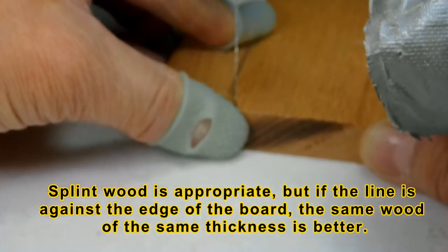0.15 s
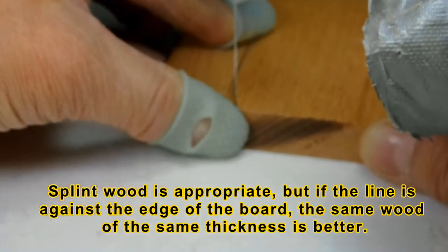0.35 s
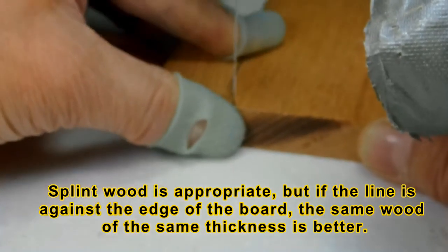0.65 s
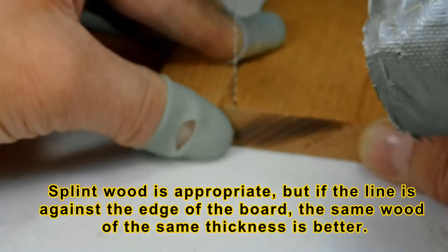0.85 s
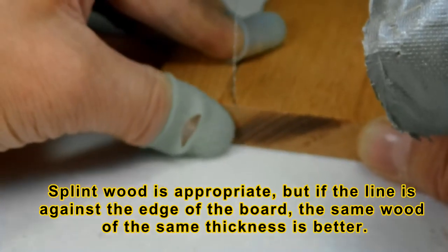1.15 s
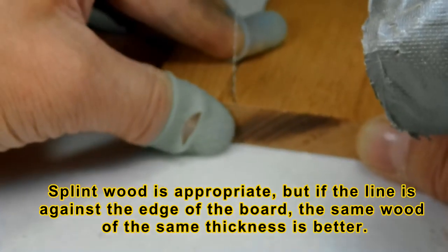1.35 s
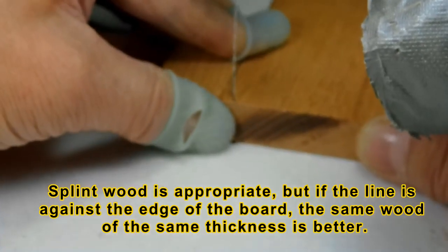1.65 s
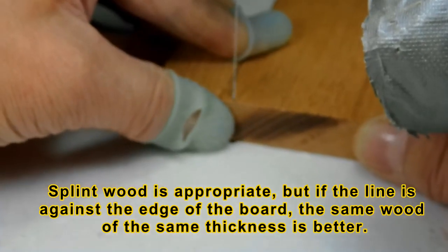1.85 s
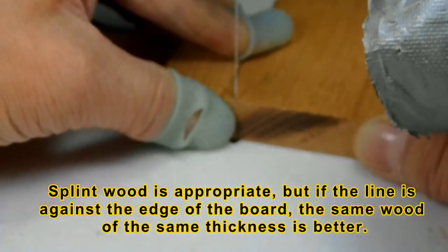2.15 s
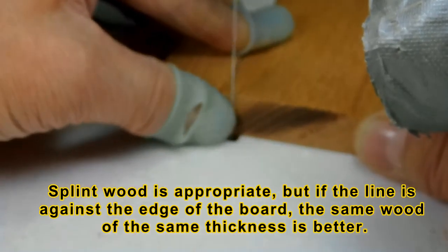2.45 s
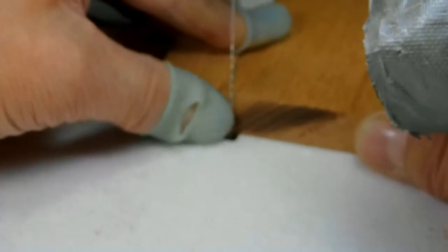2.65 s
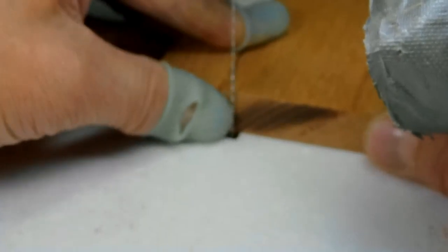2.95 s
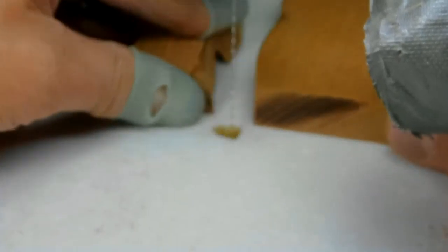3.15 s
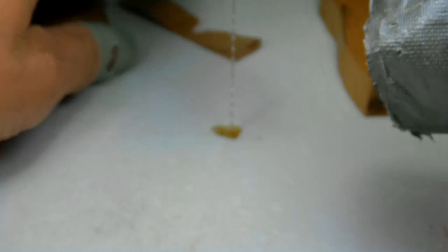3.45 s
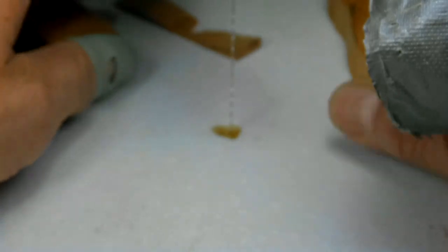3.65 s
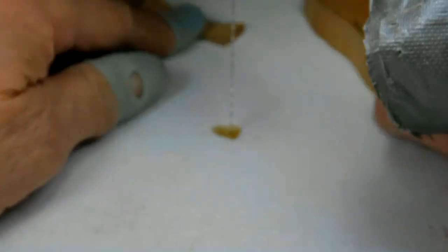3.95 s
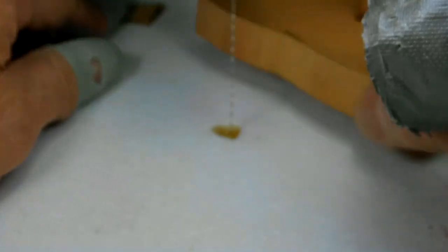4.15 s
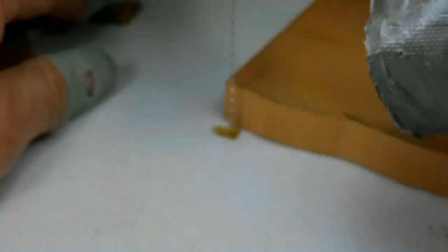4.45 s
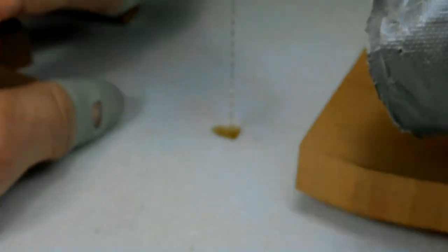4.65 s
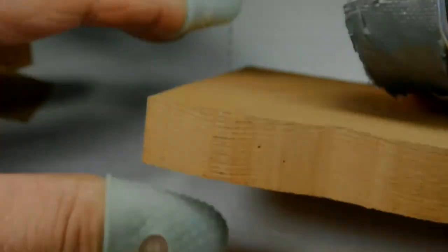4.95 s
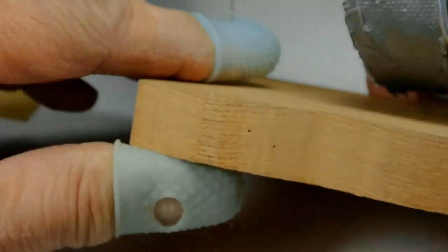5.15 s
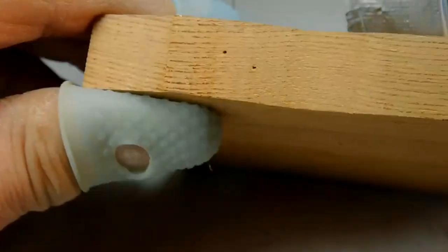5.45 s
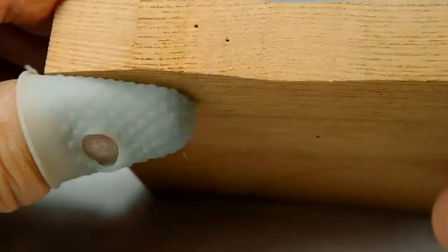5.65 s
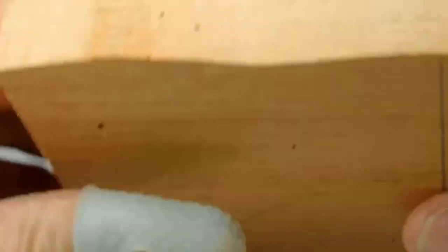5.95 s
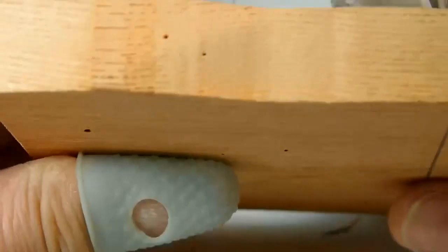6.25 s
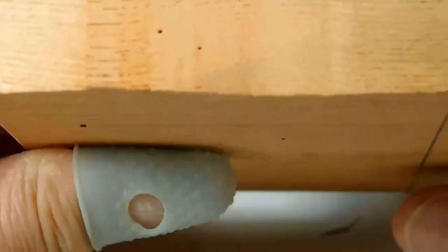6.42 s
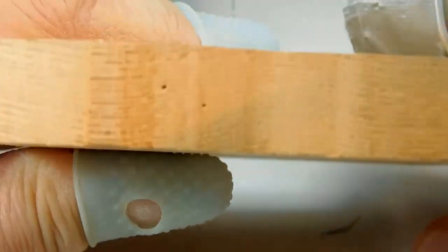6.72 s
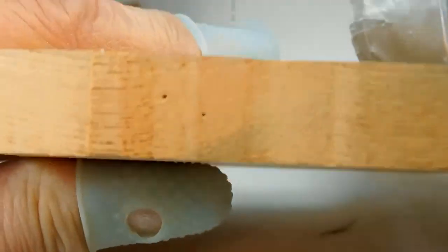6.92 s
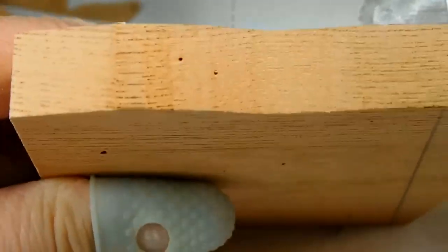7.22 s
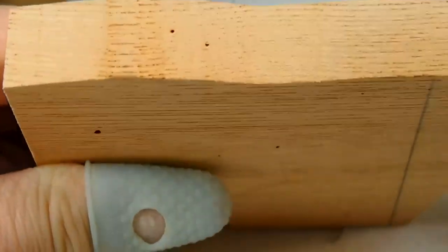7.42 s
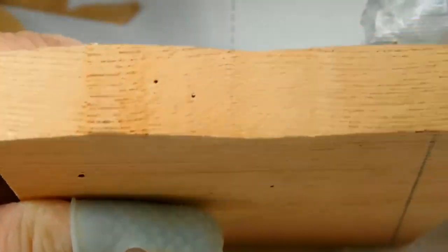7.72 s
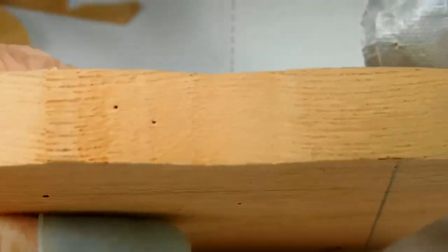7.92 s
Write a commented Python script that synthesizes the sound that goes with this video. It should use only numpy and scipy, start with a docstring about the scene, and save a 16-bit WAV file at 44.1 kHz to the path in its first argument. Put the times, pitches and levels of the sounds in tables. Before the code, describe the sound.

Fast buzzing saw strokes finish a wooden cut beside a humming suction nozzle, then only the brighter, fluttering airflow continues.

```python
"""A scroll saw finishes a cut through a thick block: band-filtered grains of noise rasp, sines locked to the
crank sing as teeth, and a squeak and a puff of chatter sound twice a stroke until the blade leaves the wood.
Beside it a dust extractor draws air through a nozzle: a sine whines, and noise rung through resonances
makes the rush, swelling and fading as hands and block move round the nozzle."""
import sys
import numpy as np
from scipy import signal
from scipy.fft import rfft, irfft
from scipy.io import wavfile
from scipy.ndimage import uniform_filter1d, map_coordinates

SR = 44100
rng = np.random.default_rng(int(sys.argv[2]) if len(sys.argv) > 2 else 0)


def pcm_store(signal):
    """Save signal as 16-bit PCM."""
    levels = np.round(np.clip(np.atleast_2d(signal), -1, 1) * 32767)
    wavfile.write(sys.argv[1], SR, levels.astype(np.int16).T)


N = 356328

# Crank speed, sagging under load and racing as the blade comes free: time_s, turns_per_s
CRANK = [(0.0, 20.11), (0.55, 20.4), (1.05, 20.72), (1.6, 19.74), (2.1, 20.57), (2.5, 19.33), (2.62, 21.63),
         (2.85, 21.02), (3.2, 20.28)]
APART_S, LIFTED_S, MOVE_S = 3.19, 5.0, .08   # halves drawn apart, block held up; time a move takes


def amp(db):
    """Level definition: the amplitude gain of a value in dB."""
    return 10 ** (np.asarray(db) / 20)


def rms_one(x):
    """Power normalisation: scale a signal to rms 1."""
    return x / np.sqrt(np.mean(x ** 2) + 1e-20)


def seconds():
    """Sampling: the time of every sample in seconds."""
    return np.arange(N) / SR


def in_time(rows, after_db=None):
    """Linear interpolation: the columns of a time table, one value a sample."""
    times, *columns = np.transpose(rows)
    return [np.interp(seconds(), times, column, right=after_db) for column in columns]


def at_hz(points, hz):
    """Logarithmic frequency scale: read a spectrum table between its points."""
    table_hz, values = np.array(points).T
    return np.interp(np.log(hz), np.log(table_hz), values)


def drift(rate):
    """Low-passed randomness: a slow wander of rms 1, changing about rate times a second."""
    samples_per_knot = 200
    knots = rng.standard_normal(int(N / samples_per_knot) + 200)
    span = max(1, int(110 / rate))
    slow = uniform_filter1d(uniform_filter1d(knots, span), span)
    return np.interp(np.arange(N) / samples_per_knot, np.arange(len(slow)), rms_one(slow))


def bell(x, centre, length):
    """Gaussian envelope: 1 at the centre, with the length as standard deviation."""
    return np.exp(-.5 * ((x - centre) / length) ** 2)


def resonate(x, hz, width_hz, count=1):
    """Damped resonance: a two-pole filter of peak gain 1, repeated count times for steeper flanks."""
    r = np.exp(-np.pi * width_hz / SR)
    g = (1 - r * r) / 2
    section = [g, 0, -g, 1, -2 * r * np.cos(2 * np.pi * hz / SR), r * r]
    return signal.sosfilt([section] * count, x)


def stereo(mid, side, alike, pan_db):
    """Interchannel coherence: mix two independent noises to a given correlation and left-minus-right level."""
    alike = np.clip(alike, -.99, .99)
    common, opposed = np.sqrt(1 + alike) * mid, np.sqrt(1 - alike) * side
    pair = np.array([common + opposed, common - opposed])
    return pair * np.array([amp(pan_db / 2), amp(-pan_db / 2)]).reshape(2, -1)


def crank_turns():
    """Kinematics: crank angle in turns is the running integral of its speed."""
    start_turns = -0.114
    return start_turns + np.cumsum(in_time(CRANK)[0]) / SR


def hiss():
    """Broadband turbulence: shaped noise fills the valleys between the resonances."""
    # Power spectrum of the air noise: frequency_hz, relative_db
    spectrum = [(12, -77), (20, -38.5), (412, -21.5), (473, -20), (575, -33), (2060, -13.5), (2570, -18),
                (3040, -9.5), (4120, -24), (9220, -21.5), (15200, -28.5)]
    # Left-right correlation: frequency_hz, likeness
    likeness = [(60, 0.8), (180, .7), (540, 0.68), (1630, 0.98), (4900, 0), (14700, .1)]
    # Left-right balance: frequency_hz, left_minus_right_db
    balance = [(60, -4), (150, -4), (380, -8), (940, -2), (2350, -5.5), (5890, -2), (14700, -4)]
    level_db = -46.5
    hz = np.maximum(np.fft.rfftfreq(N, 1 / SR), 1)
    mid, side = rfft(rng.standard_normal((2, N))) * amp(at_hz(spectrum, hz))
    out = irfft(stereo(mid, side, at_hz(likeness, hz), at_hz(balance, hz)), N)
    return amp(level_db) * out / np.std(out.mean(axis=0))


def whistles():
    """Narrow-band noise: faint, nearly steady thin notes of the extractor, one of them near twice the pitch of
    the whine."""
    # Thin notes: frequency_hz, width_hz (of one filter pass; two are made), level_db (rms before panning)
    notes = [(789, 14, -62), (942, 8, -59), (1044, 9, -62), (1071, 9, -63), (1130, 10, -67),
             (1206, 10, -64), (1270, 14, -67), (2711, 12, -60)]
    out = 0
    for hz, width_hz, db in notes:
        out = out + amp(db) * rms_one(resonate(rng.standard_normal(N), hz, width_hz, count=2))
    return out * amp([[-3.5], [2.5]])


def whine():
    """Rotational tone: the extractor's rotor sounds one sine, wavering slightly in phase and level."""
    # Rotor note: time_s, pitch_hz, level_db (rms before waver and panning)
    rotor = [(0, 467.8, -43), (1.1, 468.8, -42), (1.4, 470, -42.5), (2.1, 471.2, -44), (3.9, 471.1, -45.5),
             (8.08, 470.2, -43.5)]
    hz, db = in_time(rotor)
    phase = 2 * np.pi * np.cumsum(hz) / SR + 0.066 * drift(30)
    note = np.sin(phase) * amp(0.38 * drift(20))
    return np.sqrt(2) * amp(db) * note * amp([[-2.6], [2.0]])


def air(modes, gust, flicker_db, patchy_db, slide=None):
    """Flow-excited resonance: noise rings each mode, which flickers and wanders per channel; mean of both rms 1."""
    out = 0
    for hz, width_hz, db, pan_db, alike in modes:
        rings = resonate(rng.standard_normal((2, N + SR // 2)), hz, 1.35 * width_hz, count=2)
        if slide is None:
            mid, side = rings[:, :N]
        else:   # reading faster or slower shifts the resonance
            read_at = [np.cumsum(slide)]
            mid, side = (map_coordinates(ring, read_at, order=3) for ring in rings)
        flicker = flicker_db * (0.43 * gust + drift(21))   # shared gust plus the mode's own flicker
        patches = patchy_db * np.array([drift(1.7), drift(1.04)])
        out = out + amp(db + flicker + patches) * stereo(mid, side, alike, pan_db)
    return out / np.std(out.mean(axis=0))


def casing(gust):
    """Structural resonance: noise rings the low modes of the extractor casing."""
    # Modes: frequency_hz, width_hz (before 1.35x broadening and two passes), relative_db,
    # left_minus_right_db, likeness (left-right correlation)
    modes = [(35, 37, -26, -3, .6), (128, 17, -19.5, -6, 0.58), (188, 40, -17, -3, 0.98),
             (246, 78, -11.5, -4.5, 0.86), (347.3, 34.4, -3.5, -2.5, 1), (399, 37, -7.5, -7.5, 0.69),
             (498, 85, -4, -5.5, 0.53), (687, 175, -5, -5.5, 0.95), (787, 73, 0.5, -4.5, 0.97),
             (926.3, 69, 3.5, -6, 0.89), (1080, 130, -6.5, -1, 0.7), (1190, 36, -6.5, 8, 0.84),
             (1262, 65, -9, -5, .7)]
    # Level of the casing: time_s, level_db
    level = [(0, -44), (1.2, -47.5), (2.6, -45), (3.5, -44), (4.4, -44.5), (5.3, -45.5), (6.2, -44.5),
             (7.2, -44.5), (8.1, -43.5)]
    return amp(in_time(level)[0]) * air(modes, gust, flicker_db=0.93, patchy_db=0.76)


def nozzle_levels():
    """Acoustic shading: each group's level as the block shades the nozzle, leaves, and is held up."""
    # Rush bands near 2, 3 and 3.5 kHz: time_s, at_2k_db, at_3k_db, at_3k5_db
    mid_bands = [(0.0, -42, -52, -49), (0.04, -47, -51, -41.5), (0.16, -44.5, -49.5, -44),
                 (1.22, -43.5, -47.5, -42), (2.14, -41.5, -43, -43.5), (2.63, -39, -39, -43),
                 (3.06, -39.5, -39, -43), (3.08, -38, -35.5, -41), (3.13, -41, -42, -45),
                 (3.22, -36, -38, -42.5), (3.58, -37, -45, -48.5), (3.8, -38, -41, -45),
                 (4.0, -36, -41, -46.5), (4.3, -37, -43.5, -46.5), (4.36, -38.5, -38.5, -47.5),
                 (4.77, -36, -43.5, -46.5), (4.88, -38.5, -40.5, -46.5), (5.22, -38, -36, -42.5),
                 (5.45, -37, -44.5, -45.5), (5.49, -37.5, -43.5, -50), (5.94, -39, -45.5, -46),
                 (6.01, -38.5, -42.5, -45), (6.46, -38.5, -39.5, -43.5), (6.97, -38, -40, -45),
                 (7.18, -39.5, -42.5, -43), (7.6, -39, -45, -44), (8.03, -38, -44, -41),
                 (8.08, -36, -44, -46)]
    # Two treble bands: time_s, at_5k_db, at_9k_db
    treble_bands = [(0.0, -54, -58), (0.02, -51.5, -59), (2.11, -46.5, -56.5), (3.06, -45.5, -49),
                    (3.13, -47, -53), (3.19, -43.5, -44.5), (3.35, -46.5, -53), (3.44, -47.5, -47),
                    (4.16, -48.5, -50), (4.28, -49, -55), (4.34, -46.5, -46), (4.5, -49, -50.5),
                    (4.73, -52, -47), (4.82, -52, -49), (4.93, -48.5, -46.5), (5.11, -50, -55),
                    (5.31, -48.5, -44.5), (5.54, -43.5, -48.5), (5.85, -48, -47.5), (5.99, -48, -53),
                    (6.1, -48.5, -46), (6.37, -47.5, -49.5), (7.63, -50, -51), (8.08, -49, -48)]
    # Five more bands: time_s, at_1k8_db, at_6k3_db, at_7k7_db, at_10k5_db, at_12k_db
    more_bands = [(0.0, -46, -51, -54, -57, -59), (0.11, -47, -55.5, -56, -67, -65),
                  (1.26, -47.5, -49.5, -55, -59, -56), (1.48, -45.5, -53, -55.5, -57, -59),
                  (2.77, -42.5, -46.5, -47, -58, -58), (3.11, -42.5, -45.5, -45.5, -58, -57),
                  (3.26, -42, -52, -49, -49, -50), (3.31, -36, -54, -48, -51, -52),
                  (3.44, -39, -54.5, -51, -46, -50), (3.76, -40, -50.5, -48, -51, -51),
                  (3.89, -36.5, -54, -52, -48, -53), (4.0, -37, -57, -51, -51, -47),
                  (4.14, -37, -53, -46.5, -48.5, -55), (4.28, -41, -51, -50, -51, -50),
                  (4.34, -39, -48, -46, -51, -56), (4.45, -38, -54, -53, -44, -56),
                  (4.5, -33, -48, -53, -52, -54), (4.57, -38, -47, -45, -49, -50),
                  (4.59, -36.5, -50, -47, -52, -54), (4.75, -37, -52, -51, -49, -50),
                  (4.93, -39, -53, -46.5, -53, -52), (4.95, -37, -54, -50, -47, -50),
                  (4.99, -42, -52, -55, -53, -52), (5.31, -40, -48.5, -54, -53, -57),
                  (5.69, -40, -52, -54, -55, -51), (5.83, -42.5, -49.5, -53, -56, -53),
                  (6.21, -43, -53, -51, -53, -55), (6.25, -39, -52, -53, -54, -51),
                  (6.59, -43.5, -53, -50, -55, -53), (6.86, -41, -53, -50.5, -55, -55),
                  (7.65, -43, -53, -52, -53, -51), (7.97, -45, -55, -52, -49, -52),
                  (8.03, -45, -52, -47, -53, -50), (8.08, -39, -56, -53, -50, -52)]
    # The loosened block rides the blade and throbs the rush: time_s, swing_db (scales the two-harmonic swing)
    throb = [(0, .3), (2.3, .4), (2.55, 1.4), (3.0, 1.6), (3.15, .3)]
    edge_s, throb_place = 2.95, .98   # cut reaches the edge; zero phase of the throb in turns
    s = seconds()
    cut = np.clip(s / edge_s, 0, 1) ** 1.7
    apart, lifted = (np.clip((s - at) / MOVE_S + .5, 0, 1) for at in (APART_S, LIFTED_S))
    at_1k4 = -49.5 - 3 * cut + 6 * apart + 2.5 * lifted   # dB
    at_5k, at_9k = in_time(treble_bands)
    at_1k8, at_6k, at_8k, *top = in_time(more_bands)
    angle = 2 * np.pi * (crank_turns() - throb_place)
    throb_db = in_time(throb, after_db=0)[0] * (np.cos(angle) - 0.81 * np.cos(2 * angle))
    levels = [at_1k4, at_1k8, *in_time(mid_bands), at_5k, at_6k, at_8k, at_9k, *top]
    return [db + throb_db for db in levels]


def moving_echo(x):
    """Comb filtering: an echo off the moving hand and block, strongest with the halves apart, sweeps the colour."""
    echo_db, delay_s, wander_s = -11, .0007, .00005   # wander is the rms change of delay
    s = seconds()
    late = s - delay_s - wander_s * drift(1.5)
    moves_s = [APART_S - MOVE_S, APART_S, LIFTED_S, LIFTED_S + MOVE_S]
    strength = np.interp(s, moves_s, [0.1, 0.96, 1.0, 0.28])
    echo = np.array([np.interp(late, s, channel) for channel in x])
    return x + amp(echo_db) * strength * echo


def nozzle_rush(gust):
    """Turbulent inflow: air noise rings groups of hose and nozzle resonances, the treble with a moving echo."""
    # One list per group, low to high: frequency_hz, width_hz (before 1.35x broadening and two passes),
    # relative_db, left_minus_right_db, likeness (left-right correlation)
    groups = [
        [(1303, 18, 17, -12.5, 0.67), (1338, 17, 18.5, -8, .8), (1408, 47, 23, -2.5, 0.29),
         (1519, 17, 18.5, -11, 0.96), (1563, 68, 16.5, -7, .65)],
        [(1700, 69, -3.5, -17, 1), (1793, 132, -1.5, -5.5, 0.82), (1856, 90, 1, -8.5, 0.73)],
        [(1987, 116, 1.5, -9.5, 0.85), (2115, 186, 1, -9, 0.85), (2315, 126, -2, -7, 0.43)],
        [(2754, 170, -5.5, -9, 0.48), (2982, 246, 2, -13, 0.9), (3176, 164, -2.5, -9, .8)],
        [(3423, 100, 13, -15, .9), (3565, 330, 17.5, -9.5, 0.56)],
        [(4590, 510, 2.5, -8, 0.4), (5300, 320, -1, -3.5, 0.93)],
        [(6130, 1060, 0.5, -8, 0.25), (6910, 590, -2.5, -1, 0.18)],
        [(7465, 400, 0, -7, 0.46), (8250, 620, -1, 2.5, 0.3)],
        [(9190, 820, 0, -7, 0.32)],
        [(10590, 520, 0, -6.5, 0.26)],
        [(11980, 750, -2.5, -4, 0.37), (12850, 380, -5, 5, .4), (13500, 900, -10, -8, .2)],
    ]
    # The 3 kHz group slides as the block swings past: time_s, reference_hz (ratio to the first row is used)
    slide_rows = [(0, 2970), (4.05, 2970), (4.15, 2820), (4.5, 3020), (4.7, 2970), (5.0, 2950), (5.3, 3030),
                  (5.45, 2970)]
    slides = [None, None, None, in_time(slide_rows)[0] / slide_rows[0][1], None]
    levels = nozzle_levels()
    rush, treble = 0, 0
    for db, modes, slide in zip(levels, groups, slides):   # the five lower groups
        rush = rush + amp(db) * air(modes, gust, flicker_db=0.5, patchy_db=.5, slide=slide)
    for db, modes in zip(levels[5:], groups[5:]):
        treble = treble + amp(db) * air(modes, gust, flicker_db=0.94, patchy_db=1.7)
    return rush + moving_echo(treble)


def tones(turns, table, waver, swells=()):
    """Periodic excitation: sines at multiples of the crank, each wavering in strength and phase."""
    s, out = seconds(), 0
    for multiple, db in table:
        for swell_multiple, at_s, length_s, gain_db in swells:
            if swell_multiple == multiple:
                db = db + gain_db * bell(s, at_s, length_s)
        strength = amp(db + 4.2 * waver * drift(9.5))
        phase = 2 * np.pi * (multiple * turns + rng.random()) + waver * drift(13)
        out = out + strength * np.sin(phase)
    return out * np.sqrt(2)


def block_shake(turns):
    """Forced vibration: the gripped block shakes on the table, buzzes once severed, and a half settles."""
    # Shaking harmonics: crank_multiple, relative_db
    harmonics = [(3, 0.5), (1, -11), (2, -20), (4, -11), (6, -15)]
    # Strength of the shaking: time_s, level_db
    strength = [(0.1, -59), (0.65, -59.5), (1.47, -62), (2.06, -59), (2.2, -63), (2.54, -56), (2.68, -66),
                (2.92, -59), (2.96, -69), (3.1, -81)]
    # Notes of the severed block: crank_multiple, loudest_s, length_s (standard deviation), peak_db (before panning)
    buzzes = [(4, 2.65, .07, -60), (9, 2.65, 0.069, -59.5), (6, 2.85, .09, -63), (11, 2.86, .1, -62),
              (12, 2.86, 0.055, -59)]
    thud_s, thud_hz, thud_db, thud_t60_s = 2.95, 85, -54, .14   # the severed half settles
    s = seconds()
    steady, wavering = tones(turns, harmonics[:1], waver=.1), tones(turns, harmonics[1:], waver=0.92)
    shake = amp(in_time(strength, after_db=-120)[0]) * (steady + wavering)
    for multiple, at_s, length_s, db in buzzes:
        shake += amp(db) * bell(s, at_s, length_s) * np.sin(2 * np.pi * multiple * turns)
    since = np.maximum(s - thud_s, 0)
    shake += amp(thud_db - 60 * since / thud_t60_s) * np.sin(2 * np.pi * thud_hz * since)
    return shake * amp([[-1.6], [1.3]])


def chatter(puff):
    """Impulsive excitation: noise under the puff envelope rings blade and block."""
    # Modes of blade and block: frequency_hz, width_hz (of one filter pass; two are made), relative_db
    modes = [(1601, 99, 12.5), (2045, 570, 9), (3520, 500, 0.5), (4500, 1300, -5), (9000, 17000, -13)]
    rings = 0
    for hz, width_hz, db in modes:
        rings = rings + amp(db) * resonate(puff * rng.standard_normal((2, N)), hz, width_hz, count=2)
    return stereo(*(rings / np.std(rings[0])), .9, -8.5)


def bites():
    """Transient excitation: each hard bite is a rising chirp with chatter; also gives the gate left to the squeak."""
    # Hard bites of the blade at a stroke end: start_s, peak_db (before panning)
    hard_bites = [(0.0982, -28), (0.2184, -30), (0.2937, -30), (0.3441, -28), (0.369, -29), (0.392, -26),
                  (0.417, -26), (0.4429, -27.5), (0.4918, -28), (0.516, -31), (0.5397, -27), (0.5901, -29),
                  (0.614, -30), (0.6387, -29), (0.663, -27.5), (0.6878, -27.5), (0.7365, -27),
                  (0.7848, -26.5), (0.831, -31), (0.9308, -29), (1.025, -30.5), (1.1727, -28.5),
                  (1.369, -30.5), (1.4706, -28.5), (1.5983, -33), (1.6482, -29), (1.6716, -30),
                  (1.917, -32), (2.0433, -31.5), (2.2872, -31)]
    start_hz, glide_hz_per_s, rise_s, fall_s, chatter_db = 1500, 12000, .0014, .006, -10
    since = np.arange(int(.03 * SR)) / SR
    shape = (1 - np.exp(-(since / rise_s) ** 2)) * np.exp(-(since / fall_s) ** 2)
    shape = shape / shape.max()
    chirp = shape * np.sin(2 * np.pi * (start_hz * since + glide_hz_per_s * since ** 2 / 2))
    start_s, peak_db = np.array(hard_bites).T
    hits = np.zeros(N)
    hits[(start_s * SR).astype(int)] = amp(peak_db)
    puff = signal.fftconvolve(hits, shape)[:N]
    busy = uniform_filter1d(signal.fftconvolve(hits > 0, shape)[:N], size=400)
    free = 1 - np.clip(busy * 4, 0, 1)
    chirps = signal.fftconvolve(hits, chirp)[:N] * amp([[-5], [3]])
    return chirps + amp(chatter_db) * np.std(puff) * chatter(puff), free


def stroke_ends(turns):
    """Stick-slip: the blade stalls in the kerf as it reverses, with a squeak phased alike each stroke and a puff."""
    # Stalls: place_turns (0-1), length_turns (standard deviation), squeak_hz (at the second-row crank speed),
    # relative_db
    stalls = [(.385, .075, 1570, -1), (.885, .07, 1550, 0), (.885, .045, 1420, -6)]
    # Squeak and chatter together, gone once little wood is left: time_s, level_db (before their mix)
    strength = [(0.0, -38), (0.3, -38), (0.4, -35), (0.8, -38), (0.84, -39), (1.3, -40.5), (1.62, -37.5),
                (2.0, -42), (2.32, -39), (2.6, -58)]
    stroke = np.clip(turns, 0, 79).astype(int)
    squeak, puff = 0, 0
    for place, length, hz, end_db in stalls:
        late, louder, sharper = rng.standard_normal((80, 3))[stroke].T   # chance, held for a whole turn
        from_place = turns % 1 - place
        swell = amp(end_db + .8 * louder) * bell(from_place, .012 * late, length)
        cycles = hz * (1 + .008 * sharper) * from_place / CRANK[1][1]
        squeak = squeak + swell * np.sin(2 * np.pi * cycles + .45 * late)
        puff = puff + swell
    hard, free = bites()
    plain = amp(-4.5) * rms_one(squeak) * amp([[-5], [3]]) + amp(-9) * chatter(puff)
    return hard + free * amp(in_time(strength, after_db=-120)[0]) * plain


def ring_block(grains, modes):
    """Modal response: grains of noise, alternating between two streams, ring the block; rms 1."""
    out = 0
    for k, (hz, width_hz, db) in enumerate(modes):
        out = out + amp(db) * resonate(grains[k % 2], hz, 1.67 * width_hz, count=2)
    return rms_one(out)


def rasp(turns):
    """Fracture noise: teeth tear fibres, least as the blade climbs; their repeating pattern adds crank harmonics."""
    # Low modes of the block: frequency_hz, width_hz (before 1.67x broadening and two passes), relative_db
    low_modes = [(249.6, 59, 5.5), (307, 78, 6.5), (445, 147, 8.5)]
    # High modes of the block, same columns
    high_modes = [(590, 70, -3), (780, 130, -2.5), (920, 120, -4.5), (1100, 200, -5)]
    # Same teeth every stroke: crank_multiple, relative_db
    teeth_tones = [(11, -17.5), (13, -20.5), (15, -12.5), (17, -19), (16, -12.5), (20, -14), (21, -5.5),
                   (22, -7.5), (24, -15), (29, -20), (31, -26), (35, -10), (36, -21), (37, -10.5),
                   (39, -10.5)]
    # Tones that change for a while as the blade meets other grain:
    # crank_multiple, centre_s, length_s (standard deviation), gain_db
    swells = [(21, 0.12, 0.17, 4.5), (16, .2, 0.11, 4), (29, .45, 0.23, 10), (36, 0.53, .15, 17),
              (39, 0.53, 0.1, 4.5), (20, 0.6, 0.12, 12), (15, 0.66, 0.1, -1), (16, 1, .15, 4),
              (29, .65, 0.11, 3), (21, 0.69, 0.22, 4.5), (39, 1.66, 0.13, 5.5), (17, 1.51, 0.17, 13),
              (29, 1.8, .3, 13), (21, 1.89, .2, 6), (37, 2.0, .06, 8), (37, 2.27, 0.072, 7.5)]
    # How hard the wood grips; the blade breaks out near 2.55 s, rubs in the kerf and is clear at 3 s:
    # time_s, grip_db
    grip = [(0.0, 0.5), (0.6, -0.5), (0.8, -2.5), (1.3, -3.5), (1.38, 0), (1.65, -0.5), (2.1, 0), (2.4, 2),
            (2.48, 2.2), (2.54, 1), (2.62, -3), (2.78, -6), (2.93, -7), (3.0, -30), (3.15, -36)]
    s, (grip_db,) = seconds(), in_time(grip, after_db=-90)
    low_db = -44 - 1.8 * s + 1.5 * grip_db   # slope in dB per s as the cut nears the edge
    high_db = -46 + 0.77 * s + grip_db
    bite = amp(3.0 * np.cos(2 * np.pi * (turns - .02)) + 2.8 * np.cos(6 * np.pi * (turns - .1)))
    grains = rng.standard_normal((2, N)) * amp(3.5 * rng.standard_normal(N)) * bite
    low, high = ring_block(grains, low_modes), ring_block(grains, high_modes)
    teeth = np.sqrt(bite) * tones(turns, teeth_tones, waver=0.12, swells=swells)
    cut = amp(low_db) * (amp(-1.5) * low + amp(1.5) * teeth) + amp(high_db) * high
    return cut * amp([[-3.0], [2.3]])


def saw():
    """Crank-driven reciprocation: one crank angle times the rasp, the stroke ends and the shaking block."""
    turns = crank_turns()
    return rasp(turns) + stroke_ends(turns) + block_shake(turns)


def scene():
    """Superposition: extractor and saw add linearly, casing and nozzle sharing one gust."""
    gust = drift(15.0)
    extractor = hiss() + whistles() + whine() + casing(gust) + nozzle_rush(gust)
    return extractor + saw()


def record(dry):
    """Arrival difference and band limit: the left channel lags one sample and a steep low-pass cuts the top."""
    cutoff_hz = 15330
    ports = np.array([np.roll(dry[0], 1), dry[1]])
    return signal.sosfilt(signal.ellip(16, .5, 80, cutoff_hz, fs=SR, output="sos"), ports)


dry = scene()
out = record(dry)
pcm_store(out)
```